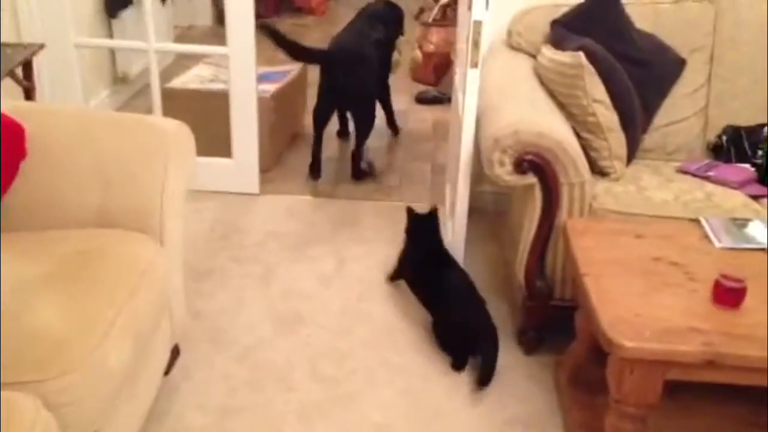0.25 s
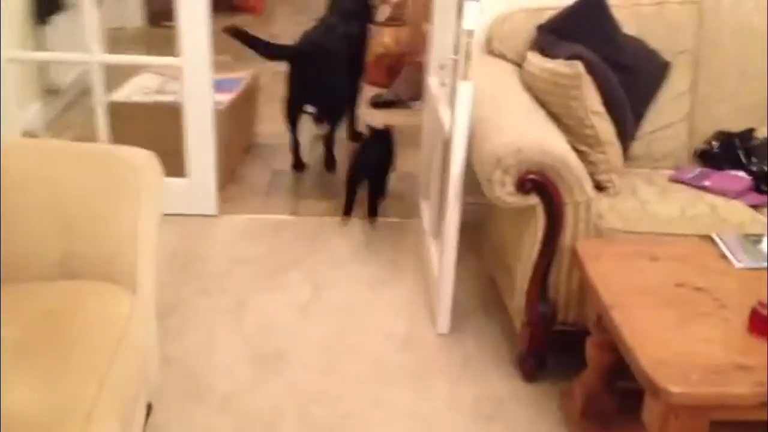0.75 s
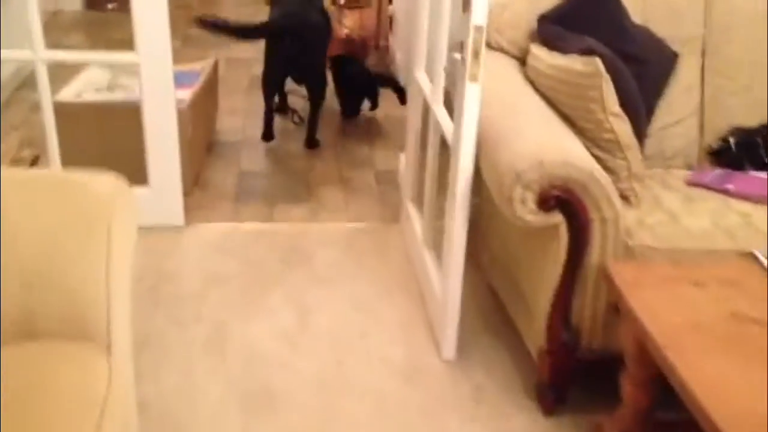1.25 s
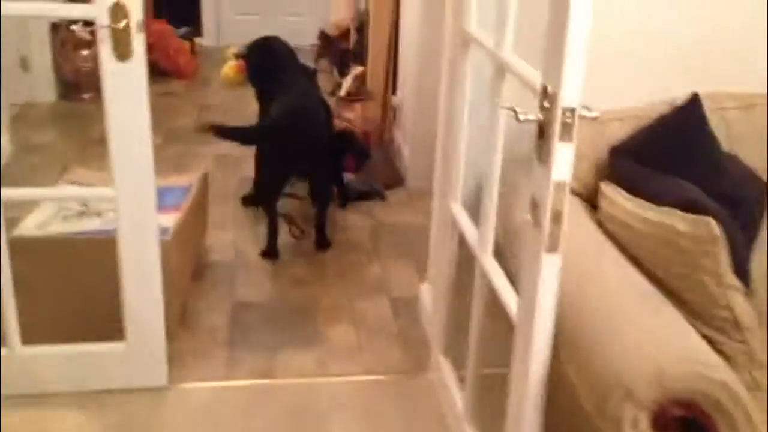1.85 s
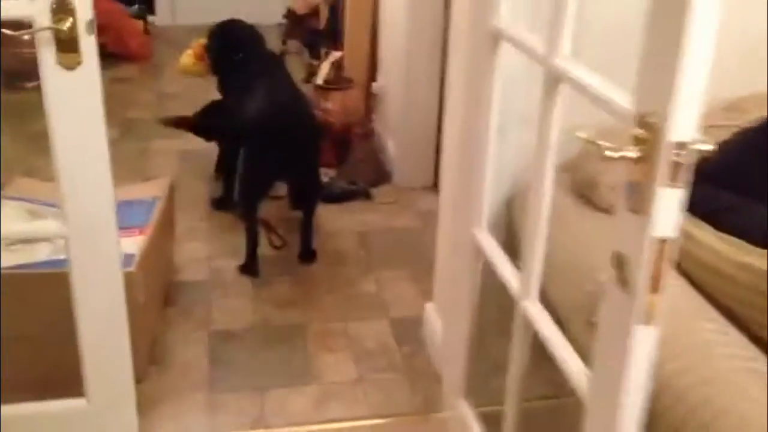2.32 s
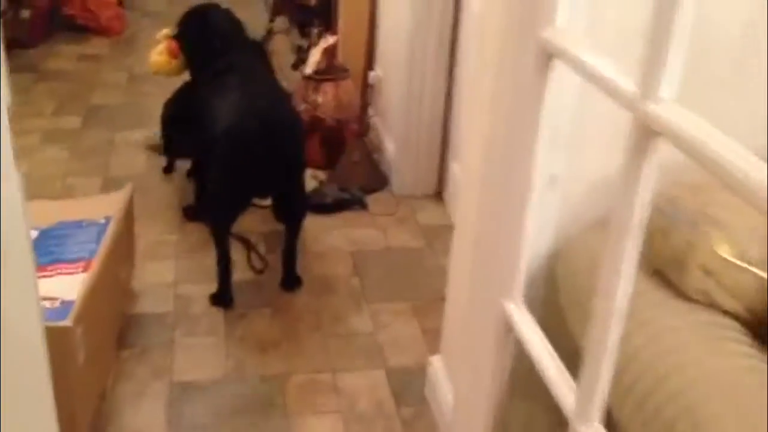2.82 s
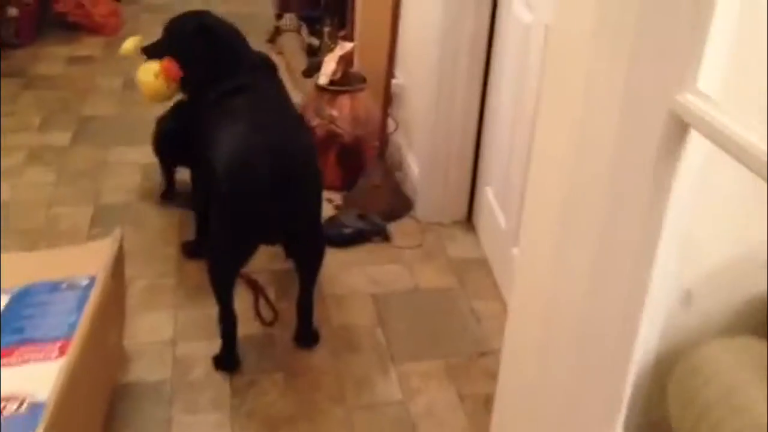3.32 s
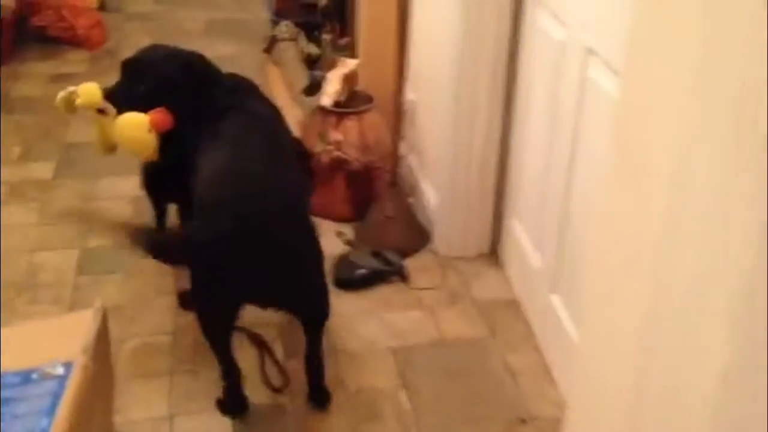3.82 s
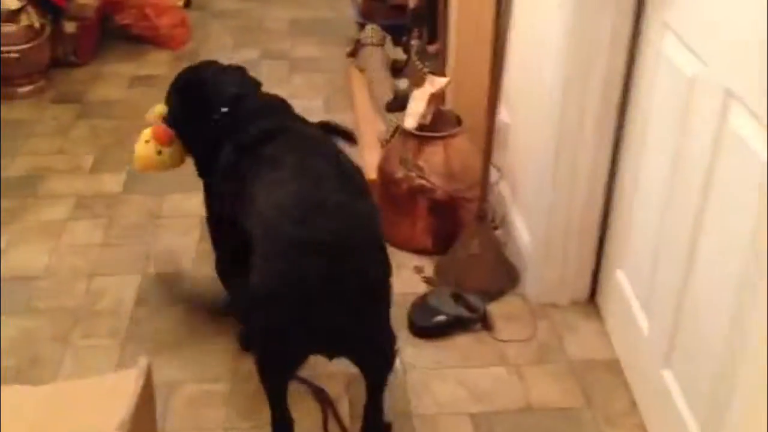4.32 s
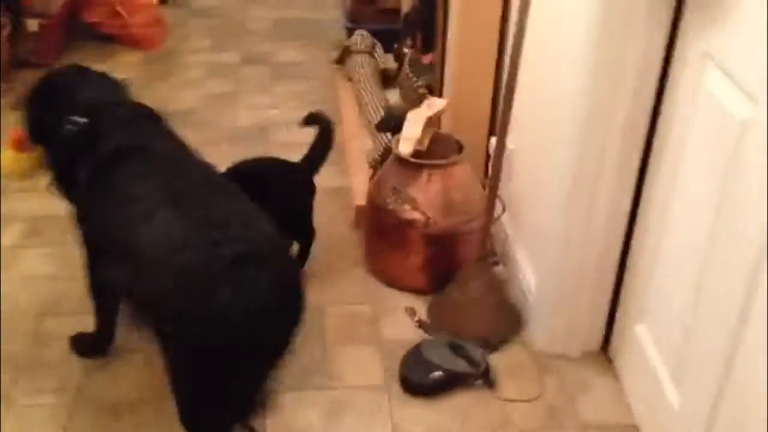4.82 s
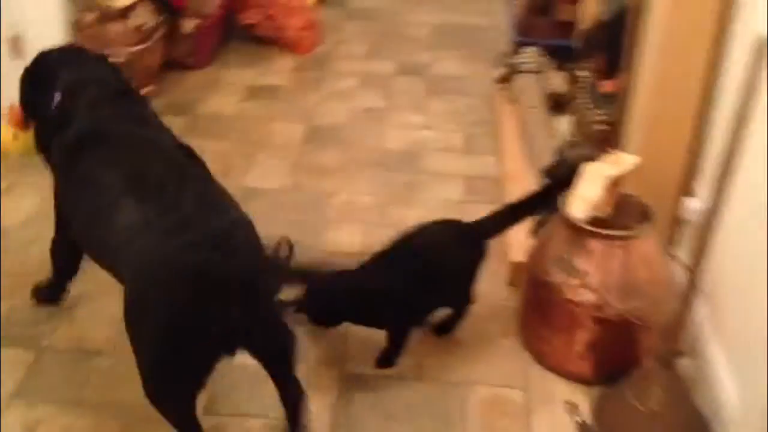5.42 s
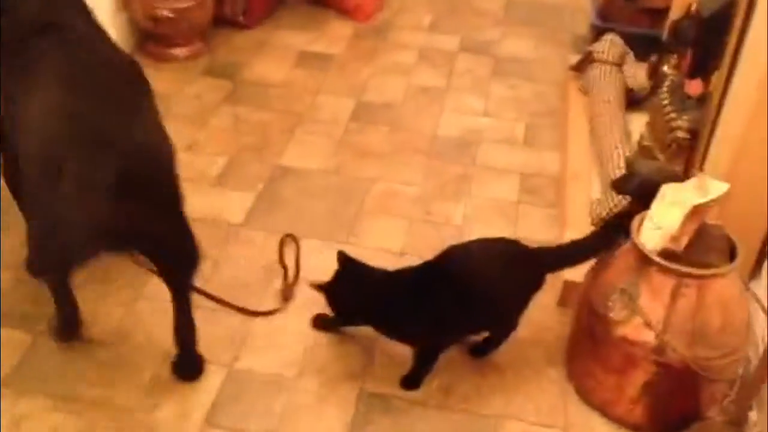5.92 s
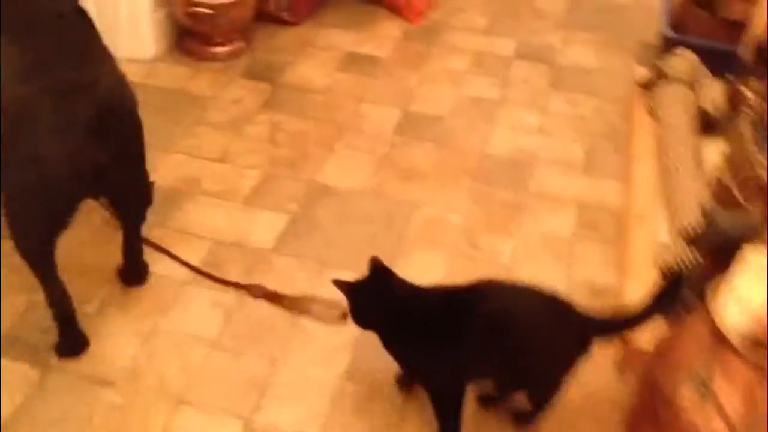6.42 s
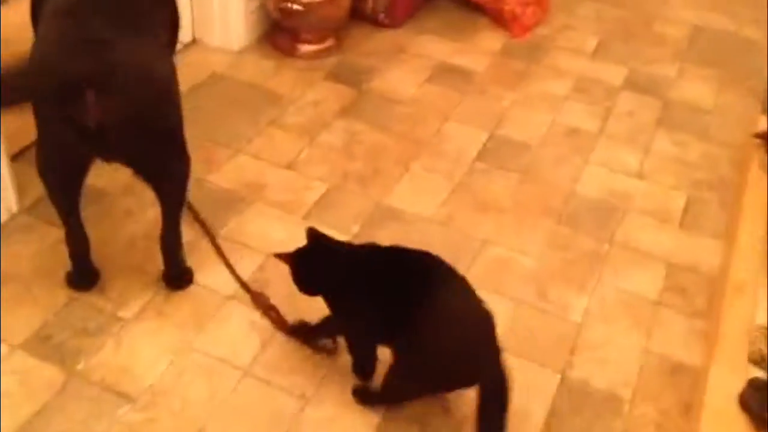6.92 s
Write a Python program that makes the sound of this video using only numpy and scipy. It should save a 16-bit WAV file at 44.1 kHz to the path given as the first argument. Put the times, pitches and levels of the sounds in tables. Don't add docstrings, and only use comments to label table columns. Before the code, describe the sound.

Irregular dog claw ticks on hard tile indoors, quiet and muffled by distance, lead to a quick cluster of cleaner taps and then near silence over faint hiss. Sharp, loud claw clacks break in close to the microphone, followed by busy clicks, sliding pads and low paw thumps. Short lively hallway reverberation surrounds every step; bass is thin and a very faint high whistle persists.

```python
import sys
import numpy as np
from scipy import signal
from scipy.fft import rfft, irfft, next_fast_len
from scipy.io import wavfile

SR = 44100
rng = np.random.default_rng(int(sys.argv[2]) if len(sys.argv) > 2 else 0)


def natural_amplitude(level_db):
    exponent = np.asarray(level_db, float) / 20
    return 10 ** exponent


def digitize_waveform(pressure):
    field = np.atleast_2d(pressure).T
    bounded = np.clip(field, -1, 1)
    quanta = np.round(bounded * 32767).astype(np.int16)
    wavfile.write(sys.argv[1], SR, quanta)


N = 315619
NEAR_FROM_S = 3


def rms_one(x):
    return x / np.sqrt(np.mean(x ** 2) + 1e-30)


def peak_one(x):
    return x / np.max(np.abs(x))


def at_hz(points, hz):
    table_hz, values = np.transpose(points)
    return np.interp(np.log(np.maximum(hz, 1)), np.log(table_hz), values)


def band(x, low_hz, high_hz):
    edges_hz = [low_hz, min(high_hz, 0.45 * SR)]
    return signal.sosfilt(signal.butter(2, edges_hz, "band", fs=SR, output="sos"), x)


def resonate(x, hz, width_hz):
    r = np.exp(-np.pi * width_hz / SR)
    feedback = [1, -2 * r * np.cos(2 * np.pi * hz / SR), r * r]
    return signal.lfilter([(1 - r * r) / 2, 0, (r * r - 1) / 2], feedback, x)


def colour(points, size):
    hz = np.arange(size // 2 + 1) * SR / size
    cepstrum = irfft(np.log(natural_amplitude(at_hz(points, hz))), size)
    cepstrum[1:size // 2] *= 2
    cepstrum[size // 2 + 1:] = 0
    return np.exp(rfft(cepstrum))


def add(track, s, sound):
    i = max(round(s * SR), 0)
    track[i:i + len(sound)] += sound[:N - i]


def grains(shape, spread_db):
    size_db = spread_db * np.minimum(rng.exponential(1, shape), 5)
    return rng.standard_normal(shape) * natural_amplitude(size_db)


# (frequency [Hz], density [dB per Hz])
TILE_COLOUR = [(290, -60.5), (500, -23), (631, -23.5), (1340, -20), (1460, -20), (2260, -10.5), (3290, -1),
               (5020, -5), (10800, -28), (14900, -34), (16000, -22.5)]
# (time [s], peak [dB], claw ring [Hz], hallway share [dB])
FAR_TICKS = [(0.011, -44, 2390, 3), (0.0304, -44.5, 3830, 2), (0.1046, -46.5, 2900, 7),
             (0.1291, -35, 3360, -1), (0.2462, -33, 3170, 2.5), (0.269, -25, 2950, -6.5),
             (0.481, -45.5, 3280, 4), (0.531, -39.5, 3850, -1), (0.5502, -34.5, 3120, 1.5),
             (0.5596, -38, 3060, -17), (0.701, -23.5, 3820, -1), (0.7188, -21.5, 2800, -8.5),
             (0.9408, -48, 3000, 0), (0.961, -45.5, 3230, 3.5), (1.0098, -39.5, 3450, -5),
             (1.114, -44.5, 4150, -0.5), (1.1436, -39, 3300, -4), (1.2102, -47.5, 3150, 2.5),
             (1.3316, -39, 3930, 1.5), (1.5463, -36.5, 4000, 2.5), (1.585, -27, 3870, -17),
             (1.591, -26, 3480, -4.5), (2.1923, -45, 3710, -7), (2.749, -54, 2530, -12),
             (2.8155, -46, 3700, -10)]
# (time [s], peak [dB], claw ring [Hz], hallway share [dB])
NEAR_TICKS = [(3.691, -33.5, 4370, -4), (3.7494, -13.5, 4340, -0.5), (3.7619, -11, 4680, -6.5),
              (4.359, -24.5, 4300, -3), (4.8451, -33, 3840, 0), (4.8584, -28, 3770, 0.5),
              (4.9459, -41, 3300, 3), (5.007, -36, 2800, 5), (5.0755, -31.5, 3670, 5),
              (5.192, -36.5, 4000, 2), (5.226, -19.5, 4470, -5), (5.2397, -24, 4700, -0.5),
              (5.2721, -27, 3060, 1.5), (5.3153, -23.5, 3540, -1), (5.38, -32, 4230, 8),
              (5.4074, -23.5, 3460, 0), (5.6161, -36, 2940, 9), (5.6442, -23.5, 3950, -2.5),
              (5.7278, -31.5, 4700, 3), (5.7606, -18.5, 3120, -6), (5.969, -39.5, 3850, 9),
              (5.9839, -35.5, 3500, 11), (6.0136, -17, 4270, -6), (6.044, -24.5, 3550, -3.5),
              (6.1859, -24.5, 5360, -2), (6.2082, -22.5, 3460, -5), (6.3404, -39, 4600, 5.5),
              (6.3993, -31, 3400, 1), (6.543, -18, 4500, -2.5), (6.8252, -40.5, 4050, -2.5)]


def claws():
    size, spots, skid_s = 4096, 3, 0.0011
    t = np.arange(size) / SR
    near, far = np.zeros(N), np.zeros((spots, N))
    ticks = FAR_TICKS + NEAR_TICKS
    tile = colour(TILE_COLOUR, size)
    tap = 1.0 * (t == 0)
    stroke = t / skid_s * np.exp(1 - t / skid_s)
    for k, ((s, db, hz, hall_db), grit) in enumerate(zip(ticks, grains((len(ticks), size), spread_db=6.5))):
        if s < NEAR_FROM_S:
            bright_db, body = -17 - 0.37 * (db + 42), 0.4
        else:
            bright_db, body = -15.5 - 0.12 * (db + 47.5), 0.8
        skid = 0.17 * rms_one(grit) * stroke
        wide = irfft(rfft([tap, 0.72 * tap + skid]) * tile, size)
        ring = resonate(wide, hz, width_hz=1640)
        treble = natural_amplitude(bright_db + 22.5) * band(wide, 5080, 13800)
        even, tick = body * band(wide, 450, 7100) + ring + treble
        add(near, s, natural_amplitude(db - 3.0) * peak_one(tick))
        spread = rms_one(rms_one(even) + 0.5 * rms_one(tick))
        add(far[k % spots], s, natural_amplitude(db + hall_db - 20.5) * spread)
    return near, far


# (time [s], peak [dB], claw ring [Hz], rebound [s], hallway share [dB])
CLEAN_STRIKES = [(1.7168, -26.5, 3880, 0.00054, -0.5), (1.7205, -41, 8500, .0003, -12),
                 (1.7232, -14.5, 4080, 0.00072, -24), (1.727, -22.5, 7740, 0.00032, -7.5),
                 (1.7302, -27, 4500, 0.0017, -2), (1.7348, -35, 8800, .0003, -17),
                 (2.2822, -47.5, 4150, 0.00049, -12), (2.5915, -51, 4370, .0005, -10),
                 (3.747, -15, 4000, 0.00083, -7.5), (3.7588, -10.5, 5140, 0.00048, -29),
                 (3.9576, -6, 5400, 0.00059, -10.5), (4.1733, -17.5, 5370, .0014, -8.5),
                 (4.1755, -17, 4300, 0.00061, -7.5), (4.4203, -47, 6400, 0.00034, 6),
                 (4.4381, -13.5, 5830, 0.0007, -6.5), (4.8465, -36, 6000, .0005, -7),
                 (5.197, -35, 7000, .0005, -6), (5.2235, -24.5, 6500, 0.00048, -11),
                 (5.3185, -29, 5500, 0.00052, -5), (5.4095, -24.5, 5100, 0.00062, -7),
                 (6.1875, -33, 5400, 0.00049, -4), (6.573, -24, 4220, 0.00052, -9.5),
                 (6.6833, -21, 5070, 0.00066, -9)]


def strikes():
    size, spots, skirting_s = 2048, 3, 0.0018
    turn = -2j * np.pi * np.arange(size // 2 + 1) * SR / size
    near, far = np.zeros(N), np.zeros((spots, N))
    tile = colour(TILE_COLOUR, size)
    skirting = 1 + 0.56 * np.exp(turn * skirting_s)
    for k, (s, db, hz, rebound_s, hall_db) in enumerate(CLEAN_STRIKES):
        crack_db = -11 if s < NEAR_FROM_S else 20
        rebound = np.exp(turn * rebound_s)
        direct = (1.07 + rebound + 0.12 * rebound ** 2) * skirting
        contact = irfft([direct, 1 + 0.28 * rebound], size)
        ring = resonate(resonate(contact, hz, width_hz=1200), hz, width_hz=1200)
        crack = band(contact, 4450, 7000) + 1.3 * resonate(contact, 7200, width_hz=1200)
        hit = peak_one(ring[0]) + natural_amplitude(crack_db) * peak_one(crack[0])
        add(near, s, natural_amplitude(db) * peak_one(hit))
        spread = rms_one(irfft(rfft(contact[1]) * tile, size))
        spread += 0.26 * natural_amplitude(-crack_db / 2) * rms_one(ring[1])
        spread += 0.11 * natural_amplitude(crack_db / 2) * rms_one(crack[1])
        add(far[k % spots], s, natural_amplitude(db + hall_db - 12) * rms_one(spread))
    return near, far


# (time [s], length [s], rms [dB], centre [Hz])
SCUFFS = [(.0, 0.061, -56.5, 3800), (0.501, 0.03, -61, 3320), (0.696, 0.019, -40, 5760),
          (.70, 0.036, -49.5, 1900), (0.95, 0.18, -66, 3500), (1.314, 0.045, -56.5, 4000),
          (1.536, 0.075, -51, 4450), (1.668, 0.048, -57, 4130), (3.481, 0.15, -70, 3520),
          (2.734, 0.027, -69.5, 2500), (3.161, 0.014, -66, 1170), (3.489, 0.21, -72, 990),
          (0.246, 0.04, -49.5, 1730), (3.743, 0.017, -35, 6150), (4.35, 0.016, -73, 6370),
          (4.602, 0.69, -64, 3170), (4.839, 0.038, -44, 3800), (5.202, 0.059, -41, 4270),
          (5.261, 0.096, -46.5, 1480), (4.946, 0.25, -68, 910), (1.846, 0.14, -74, 880),
          (5.383, 0.072, -44, 3530), (5.6, 0.037, -42.5, 4540), (5.819, 0.057, -52, 4550),
          (5.973, 0.052, -39.5, 4500), (6.2, 0.026, -52.5, 1580), (6.335, 0.1, -53.5, 3950),
          (6.529, 0.061, -42, 4200), (6.708, 0.046, -48.5, 1400), (6.953, 0.086, -59.5, 3600)]


def slides():
    out, size = np.zeros(N), 16384
    t = np.arange(size) / SR
    for (s, length_s, db, hz), grit in zip(SCUFFS, grains((len(SCUFFS), size), spread_db=4.0)):
        rub = 0.6 * band(grit, hz / 1.74, hz * 1.27)
        rub += 1.3 * resonate(grit, hz, width_hz=hz / 3.2)
        rub += 0.044 * band(grit, hz * 0.75, hz * 3.4)
        rub += 0.25 * band(grit, hz / 3.0, hz / 0.45)
        stroke = np.sin(np.pi * np.minimum(t / length_s, 1))
        add(out, s, natural_amplitude(db) * rms_one(rub) * stroke)
    return out


# (time [s], peak [dB], floor ring [Hz], t60 [s])
FLOOR_THUMPS = [(0.022, -49, 297, 0.074), (0.25, -30, 338, 0.14), (0.678, -46.5, 300, 0.091),
                (0.74, -54.5, 309, 0.26), (0.804, -43, 185, 0.064), (0.948, -46.5, 219, 0.12),
                (1.016, -47, 345, 0.15), (1.066, -47.5, 322, 0.19), (1.36, -52.5, 340, 0.12),
                (1.684, -49.5, 210, 0.14), (1.724, -55, 247, 0.17), (3.693, -55, 265.3, 0.79),
                (3.754, -46.5, 175, 0.13), (3.9563, -28.5, 169, 0.093), (4.448, -42, 164, 0.22),
                (4.565, -51, 169, 0.14), (4.666, -54, 162.3, 0.39), (6.199, -46, 191, 0.15),
                (5.068, -33, 156, 0.13), (5.224, -45.5, 536, 0.12), (5.264, -48.5, 561, 0.34),
                (5.468, -38.5, 194.5, 0.14), (5.551, -50, 201, 0.12), (5.814, -44.5, 412, 0.078),
                (5.835, -40.5, 193, 0.13), (5.97, -45.5, 145, 0.12), (6.182, -36, 318, 0.15),
                (6.349, -49, 200, 0.17), (6.56, -43.5, 289, 0.19), (6.684, -35, 212.7, 0.26),
                (.25, -31, 620, 0.09),
    (.251, -35, 880, 0.078),
    (0.89, -76, 330, 0.083),
    (.614, -69, 500, 0.075),
    (3.5, -81, 450, .04),
]


def thumps():
    out, size = np.zeros(N), 22050
    t = np.arange(size) / SR
    blows = FLOOR_THUMPS
    detune = rng.uniform(-1.36, 1.0, len(blows))
    noise = rng.standard_normal((len(blows), size))
    for (s, db, hz, t60_s), d, n in zip(blows, detune, noise):
        knock_db = -10 - 0.81 * (db + 50) + 9.5 * np.log2(hz / 250)
        pair_hz = hz * (1.1 + 0.058 * d)
        pair = np.sin(2 * np.pi * hz * t) + 0.86 * np.sin(2 * np.pi * pair_hz * t)
        ring = pair + 0.82 * rms_one(band(n, hz / 1.39, hz * 1.22))
        blow = ring * natural_amplitude(-60 * t / max(t60_s, 0.02)) * (1 - np.exp(-t / 0.0058))
        knock = rms_one(band(n, 370, 780)) * np.exp(-t / 0.021) * (1 - np.exp(-t / 0.0057))
        add(out, s, natural_amplitude(db - 2.0) * (blow + natural_amplitude(knock_db) * knock))
    out = signal.sosfilt(signal.butter(6, 120, "high", fs=SR, output="sos"), out)
    add(out, 5.078, natural_amplitude(-55) * np.sin(2 * np.pi * 55 * t) * np.exp(-t / 0.026))
    return out


def doorway(x):
    dull = signal.sosfilt(signal.butter(2, 7500, fs=SR, output="sos"), x)
    return np.where(np.arange(N) < NEAR_FROM_S * SR, dull, x)


# (frequency [Hz], t60 [s])
HALLWAY_T60 = [(150, 0.73), (400, 0.67), (1000, 0.47), (2800, 0.44), (7000, 0.4), (14000, 0.32)]


def hallway(feeds, onset_s=0.0019):
    t = np.arange(SR) / SR
    noise = grains((2, len(feeds), SR), spread_db=4.0)
    edges_hz = 90 * 2 ** np.arange(0, 8, 0.5)
    echo = 0
    for k, (low_hz, high_hz) in enumerate(zip(edges_hz, edges_hz[1:])):
        t60_s = at_hz(HALLWAY_T60, np.sqrt(low_hz * high_hz))
        echo = echo + band(noise[k % 2], low_hz, high_hz) * natural_amplitude(-60 * t / t60_s) / np.sqrt(t60_s)
    onset = 1 - np.exp(-(t / onset_s) ** 2)
    near_walls = 0.6 * np.exp(-t / 0.038)
    rooms_beyond = 0.038 * np.exp(np.minimum(t / 0.093, 4.5))
    echo = echo * onset * (1 + near_walls + rooms_beyond)
    echo = echo / np.sqrt(np.sum(echo ** 2, axis=1, keepdims=True))
    return signal.fftconvolve(feeds, echo, axes=1)[:, :N].sum(axis=0)


def creaks():
    per_s, level_db, cycles = 150.0, -78.5, 5.4
    born = (rng.random(N) < per_s / SR) * rng.standard_normal(N)
    dealt = rng.integers(0, 8, N)
    out = np.zeros(N)
    for k, hz in enumerate(np.geomspace(280, 760, 8)):
        bumps = born * (dealt == k) + 1e-18
        out += resonate(resonate(bumps, hz, hz / cycles), hz, hz / 1.7)
    return natural_amplitude(level_db) * rms_one(out)


# (frequency [Hz], density [dB per Hz])
HISS_COLOUR = [(24, -64), (40, -49), (147, -7.5), (176, 1.5), (209, -2.5), (412, -5.5), (585, -14.5),
               (1020, -12), (1900, -14.5), (4240, -11), (7540, -14), (14800, -14.5), (16000, -30)]
# (time [s], level [dB])
RUMBLE_LEVEL = [(0.0, -70), (0.4, -54), (0.76, -72.5), (1.75, -60), (2.07, -76), (3.6, -74), (4.0, -61.5),
                (4.82, -59.5), (5.3, -51), (5.6, -54.5), (6.7, -60.5), (7.16, -76)]


def background():
    size = next_fast_len(N)
    t = np.arange(N) / SR
    white = rng.standard_normal((3, size))
    hz = np.arange(size // 2 + 1) * SR / size
    hiss = irfft(rfft(white[0]) * natural_amplitude(at_hz(HISS_COLOUR, hz)), size)[:N]
    lumps = natural_amplitude(2.57 * rms_one(band(white[1, :N], 10.4, 28)))
    level_db = np.interp(t, *np.transpose(RUMBLE_LEVEL))
    rumble = natural_amplitude(level_db - 7.0) * rms_one(band(white[2, :N], 146, 600) * lumps)
    whistle = natural_amplitude(-82) * np.sqrt(2) * np.sin(2 * np.pi * 15000 * t)
    return natural_amplitude(-66.5) * rms_one(hiss) + rumble + whistle


def scene():
    ticks, far_ticks = map(doorway, claws())
    hits, far_hits = strikes()
    rubs, weight = doorway(slides()), thumps()
    far = far_ticks + far_hits
    far[0] += 0.86 * rubs + 0.33 * weight
    mix = ticks + hits + 1.05 * rubs + weight
    return (mix + hallway(far) + background() + creaks())[None]


def low_pass(x):
    return signal.sosfilt(signal.butter(12, 16480, fs=SR, output="sos"), x)


def record(dry):
    mix = signal.sosfilt(signal.cheby2(12, 45, 16050, fs=SR, output="sos"), dry)
    return low_pass(mix)


dry = scene()
out = record(dry)
digitize_waveform(out)
```